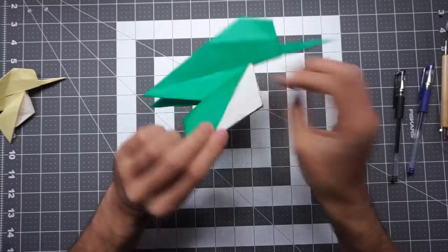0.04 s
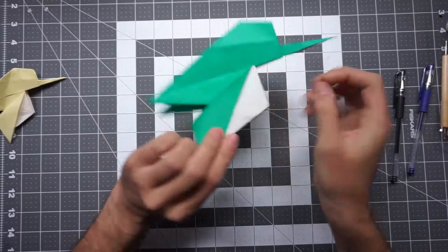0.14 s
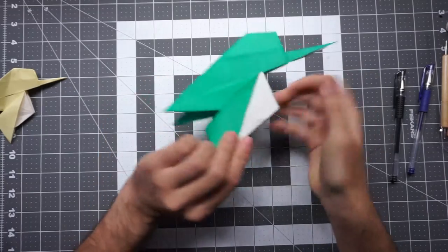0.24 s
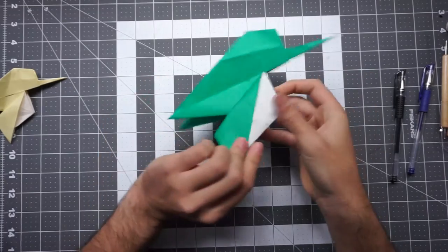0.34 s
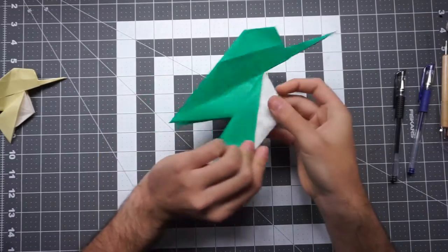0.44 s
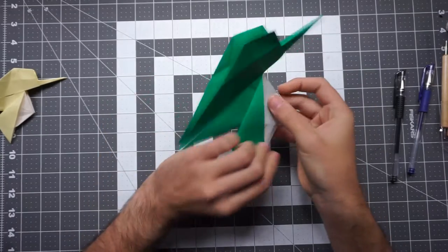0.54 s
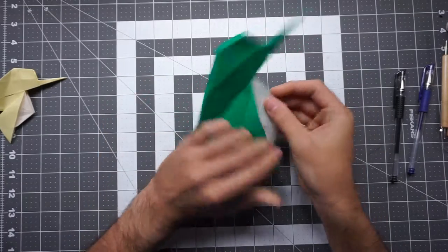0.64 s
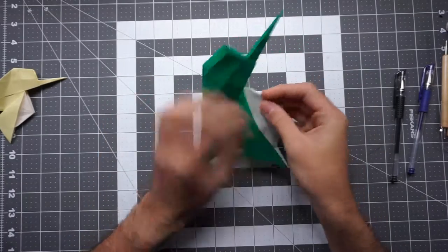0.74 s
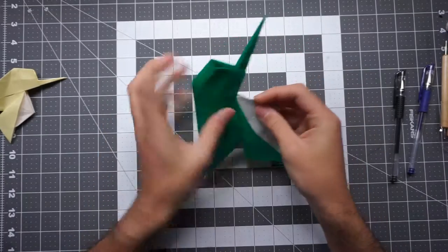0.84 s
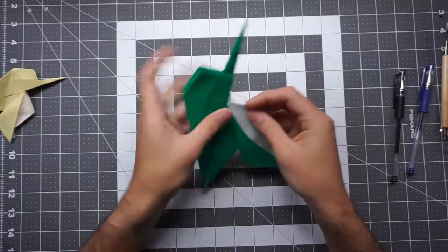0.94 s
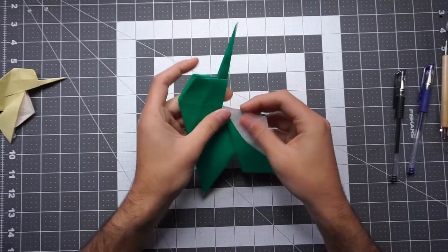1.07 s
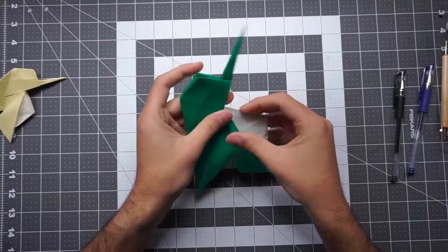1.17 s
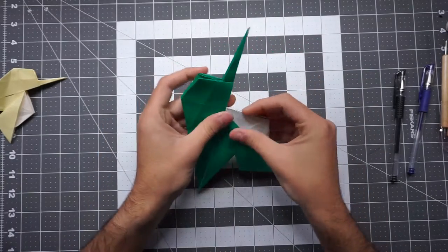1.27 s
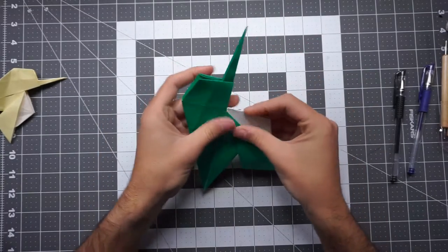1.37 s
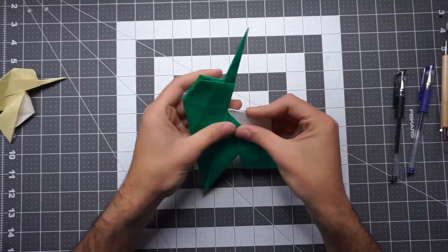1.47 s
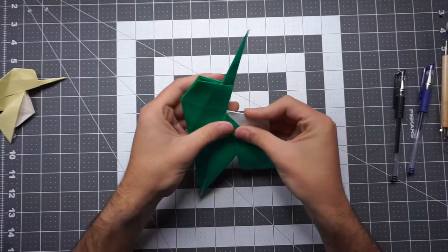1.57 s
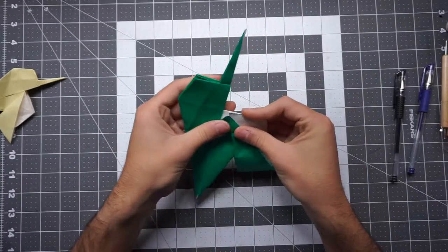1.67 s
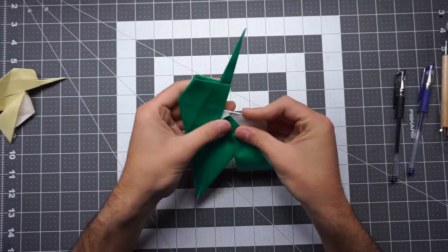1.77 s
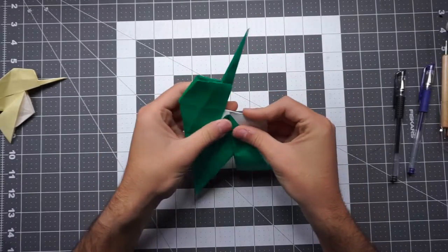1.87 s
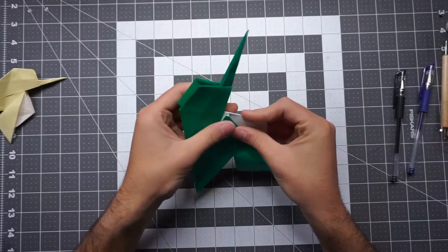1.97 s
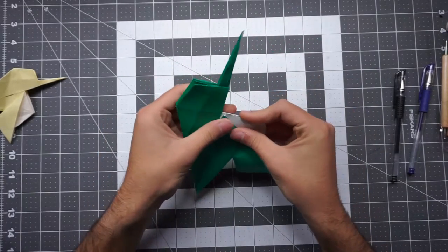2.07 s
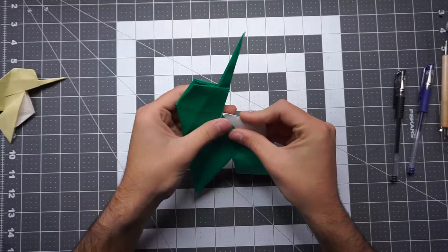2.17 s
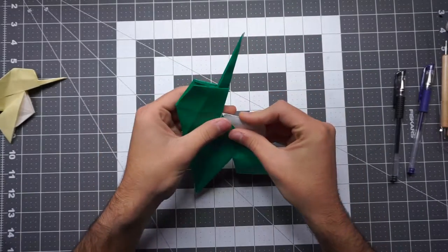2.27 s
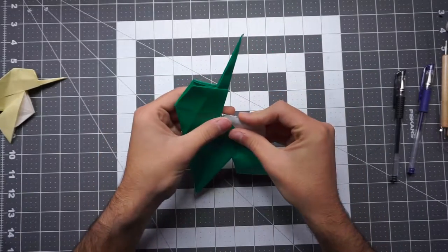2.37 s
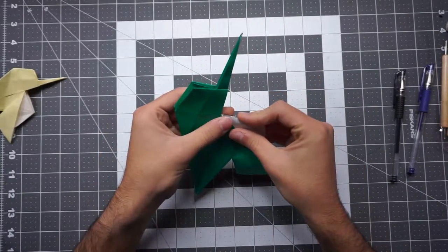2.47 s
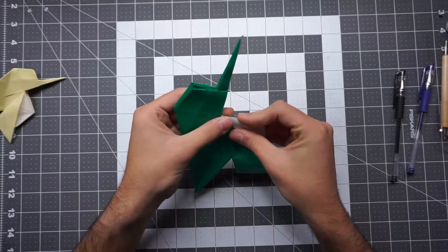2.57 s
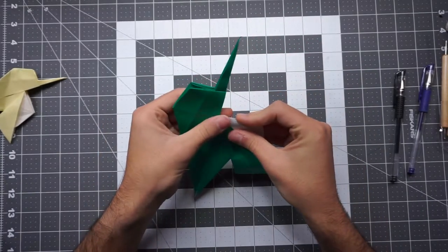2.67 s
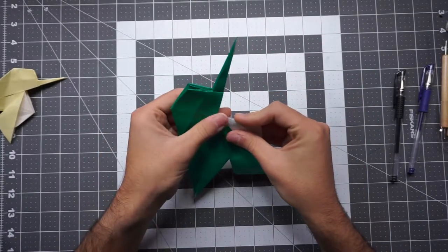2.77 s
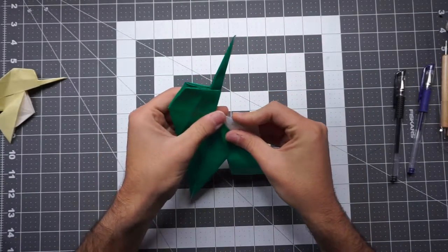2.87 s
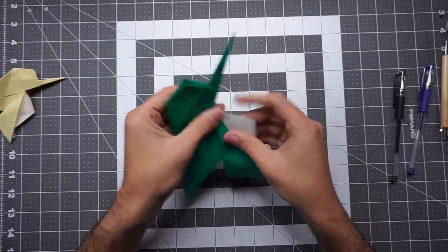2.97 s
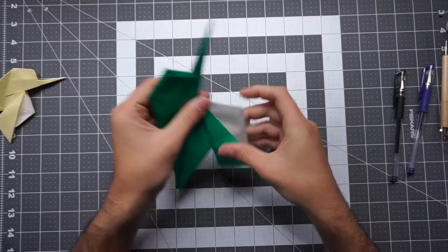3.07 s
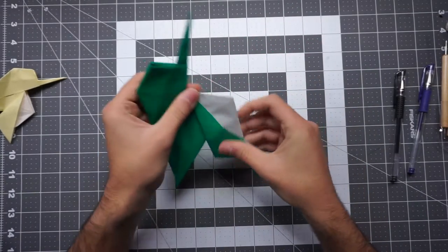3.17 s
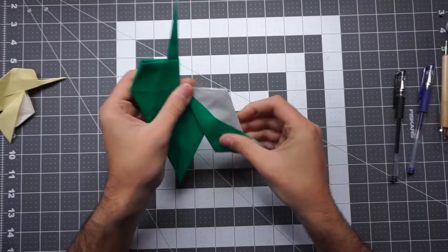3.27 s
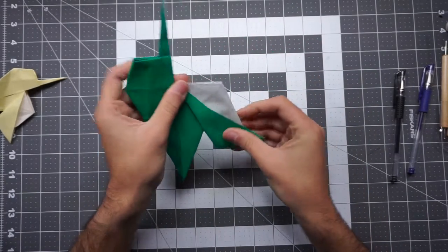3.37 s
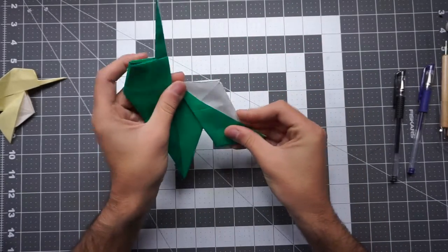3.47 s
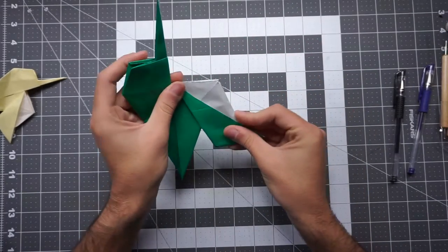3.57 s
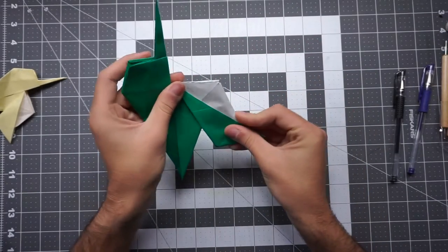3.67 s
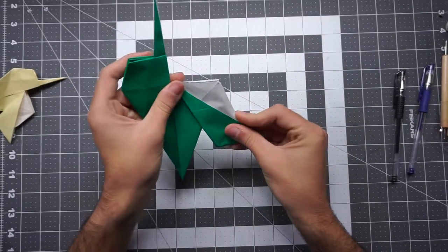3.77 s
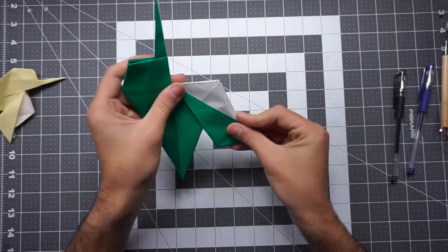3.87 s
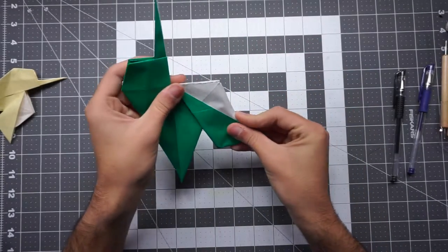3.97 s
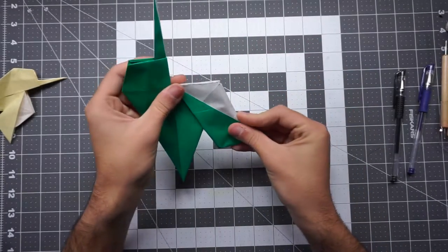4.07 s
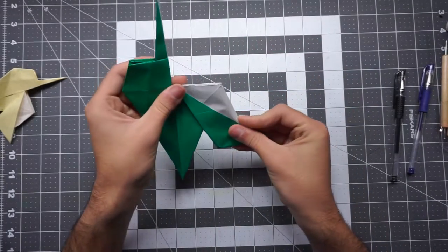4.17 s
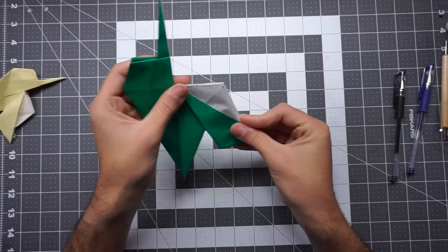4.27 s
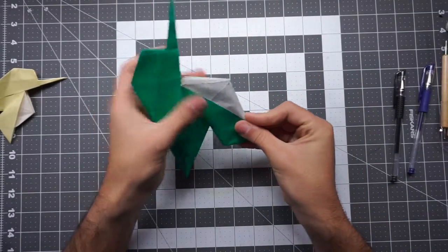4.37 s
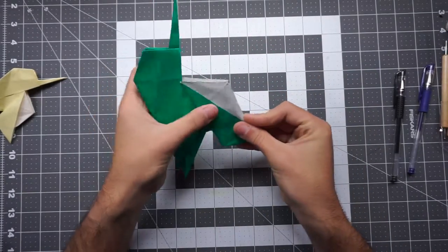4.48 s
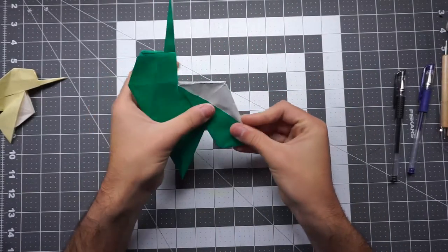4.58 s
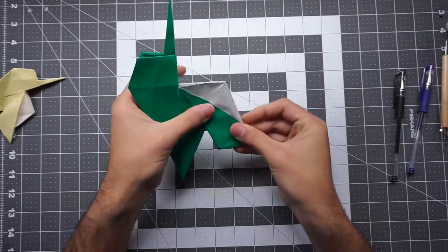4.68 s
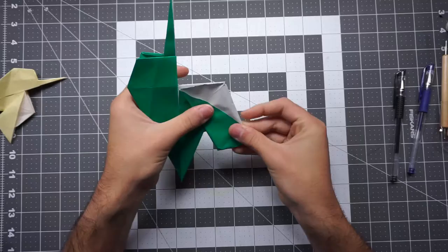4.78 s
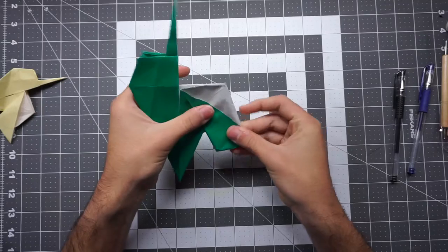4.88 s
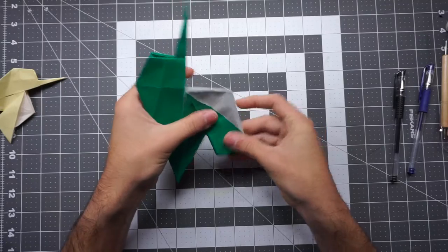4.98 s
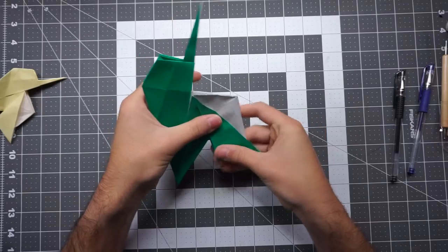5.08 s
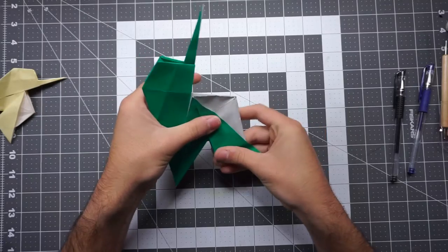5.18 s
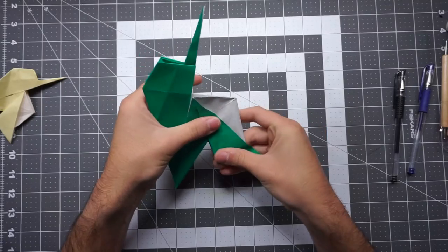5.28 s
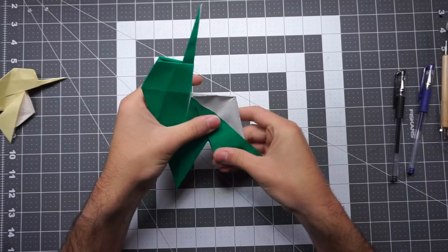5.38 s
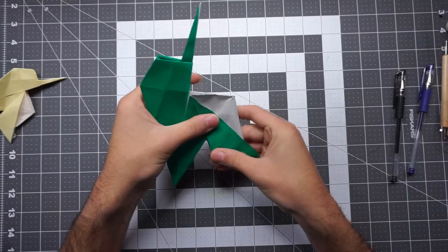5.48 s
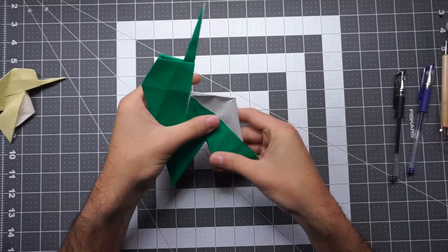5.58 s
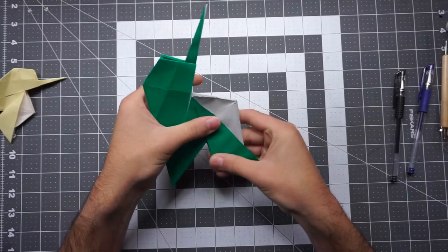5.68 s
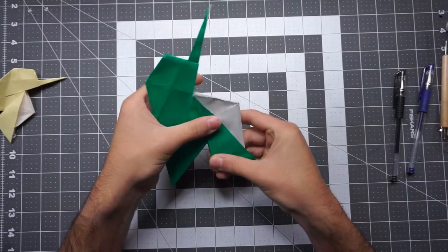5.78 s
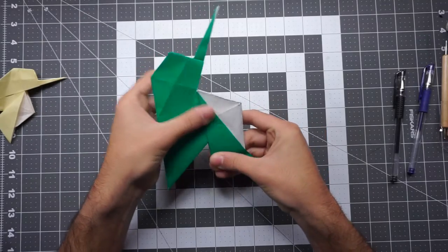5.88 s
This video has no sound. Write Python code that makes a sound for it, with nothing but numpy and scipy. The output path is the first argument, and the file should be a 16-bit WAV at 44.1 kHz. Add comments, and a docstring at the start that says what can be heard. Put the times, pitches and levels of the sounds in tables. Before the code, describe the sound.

Close stereo pickup of hands folding a paper figure above a mat in a small room. Dense crisp snaps and rustles come first, thinning after about two seconds to near quiet. Crackling returns around three seconds, with a tight cluster at four and a half and a last burst near the end. Faint room noise and a thin fluttering whir run throughout; a weak low hum joins late.

```python
"""Two hands fold a paper figure just above a cutting mat, close to a stereo microphone in a small room.
From the start: shaped room noise, a fluttering noise whir near 1 kHz and the rustle of grip and strokes (grains).
The sheet soon buckles in short snaps (crack, ring, flutter, mat echo), with crinkles at random and soft desk bumps.
From about 2.8 s a faint hum with a soft rumble emerges, slowly rising in pitch and varying in level."""
import sys
import numpy as np
from scipy import signal
from scipy.fft import rfft, irfft, next_fast_len
from scipy.io import wavfile
from scipy.ndimage import uniform_filter1d, map_coordinates

SR = 44100
rng = np.random.default_rng(int(sys.argv[2]) if len(sys.argv) > 2 else 0)


def master(y):
    """Save y as 16-bit WAV."""
    cut = np.clip(np.atleast_2d(y).T, -1, 1)
    pcm = np.round(cut * 32767)  # scale
    wavfile.write(sys.argv[1], SR, pcm.astype(np.int16))


N = 261513

# buckles of the sheet: t/s, level/dB before common gain, treble over bass/dB, facet ring f/Hz, flutter t60/s
SNAPS = [(0.0159, -33, 6, 5140, 0.0053), (0.0353, -31.5, 17, 3060, 0.043), (.1716, -39.5, -3, 3260, .016),
         (0.1967, -22, 16.5, 4530, 0.015), (.256, -44, -8, 1620, 0.019), (0.273, -28, 33, 5840, 0.008),
         (0.2763, -24, 11, 3500, 0.033), (0.3334, -35, 43, 10300, 0.0023), (.408, -31.5, -8.5, 1570, 0.023),
         (0.4298, -33, -12, 3300, .016), (0.4701, -26.5, 7, 4280, 0.049), (0.475, -27, 32, 9900, .016),
         (.493, -29.5, -9, 3200, 0.016), (.5367, -27.5, 18, 5530, 0.027), (0.5521, -30.5, 15, 4000, 0.0082),
         (.554, -22, 7, 5500, 0.023), (0.6558, -22.5, 12, 4440, 0.054), (0.7693, -33.5, 11, 2430, 0.029),
         (0.817, -27, 4, 4420, 0.039), (0.8982, -32.5, 44, 9850, 0.057), (1.1213, -32, 12.5, 8900, .027),
         (1.3255, -34.5, 1, 2550, 0.044), (1.4063, -41, 22, 2950, 0.012), (1.5075, -22.5, 14, 3850, 0.029),
         (1.5176, -24.5, 9, 2050, 0.009), (1.6519, -27.5, 6.5, 4070, 0.0095), (2.104, -42, 14, 5630, 0.096),
         (2.375, -38.5, -5, 2480, 0.058), (2.69, -46.5, 16, 8200, 0.047), (2.946, -41.5, 2.5, 1800, 0.05),
         (2.984, -41.5, -28, 3020, 0.022), (3.075, -36.5, 2, 1450, 0.043),
         (3.1565, -35.5, -10, 1660, 0.045), (3.2048, -20.5, 12.5, 5600, 0.022),
         (3.3671, -22, 30, 7040, 0.021), (3.3986, -39.5, 4, 3530, 0.017), (3.4674, -45.5, 30, 7900, 0.0063),
         (3.48, -40.5, 2, 3180, 0.018), (3.4914, -36, -2, 1580, 0.037), (3.5866, -37, 0.5, 4000, 0.02),
         (3.601, -43.5, -10, 1640, .016), (3.834, -41, -15, 2930, 0.018), (3.8433, -38.5, 23, 4550, 0.0089),
         (4.1585, -40, -7, 1900, 0.016), (4.1768, -28.5, 1, 1690, 0.019), (4.3258, -34.5, -1, 1890, 0.036),
         (4.3455, -30.5, 8, 10100, 0.019), (4.38, -27.5, 19, 4130, 0.0064), (4.3942, -35, -12, 4280, 0.022),
         (4.46, -28.5, 8.5, 2800, 0.037), (4.5038, -31, 3, 2370, 0.036), (4.51, -22.5, 15, 7480, 0.013),
         (4.5174, -24.5, 23, 4070, 0.0083), (4.5524, -23.5, 32, 10400, .016),
         (4.5748, -24, 23, 4050, 0.0095), (4.5816, -20.5, 30, 7500, 0.014), (4.672, -34, -6, 1830, 0.027),
         (4.7134, -36.5, 1.5, 800, 0.014), (4.7924, -40, -4.5, 1720, 0.019), (4.8094, -36, -21, 1470, .01),
         (4.8239, -29.5, -4, 2420, 0.023), (4.8485, -30.5, -20, 1110, .01),
         (4.893, -35.5, -13, 1800, 0.019), (4.9207, -42.5, -1, 1970, 0.019),
         (4.974, -36.5, 1.5, 9550, 0.023), (5.0939, -30.5, 3.5, 1900, 0.037), (5.1556, -43, 14, 2780, .012),
         (5.204, -41, -4, 3300, 0.0038), (5.2491, -39, 11, 10680, 0.027), (5.3583, -37, 25, 10500, 0.014),
         (5.4081, -30, 10.5, 6000, 0.0086), (5.515, -36, 13, 9000, 0.026), (5.5282, -35.5, -6, 1830, 0.016),
         (5.638, -42, 28, 10760, .012), (5.7325, -44.5, 18, 6400, 0.032), (5.8015, -34.5, -8, 1110, 0.024),
         (5.813, -21, 30, 6200, 0.0024), (5.8212, -29, 6, 10700, 0.021), (5.8375, -31, 3, 3260, 0.04)]
# pushes of paper over paper: start t/s, length/s, sliding level/dB, flexing level/dB (both before
# layer gain), rubbed flap f/Hz
STROKES = [(0, .18, -44, -46.5, 4800), (0.267, 0.028, -34, -41, 3750), (0.354, 0.025, -38.5, -43.5, 10000),
           (0.419, 0.12, -39.5, -43.5, 3330), (0.454, 0.038, -26, -52, 9600),
           (0.544, 0.039, -31.5, -62, 10400), (0.608, 0.049, -36.5, -46, 8500),
           (0.765, 0.01, -38, -44, 2330), (0.881, 0.091, -33.5, -48, 9300),
           (0.994, .14, -41.5, -47.5, 8500), (1.18, 0.13, -49.5, -64, 9000), (1.328, 0.028, -37, -43, 8450),
           (1.369, 0.031, -56, -52, 9200), (1.504, 0.024, -34, -44, 1500), (1.619, .045, -51, -52, 3900),
           (1.876, 0.077, -55, -55.5, 3650), (1.933, 0.032, -35.5, -56, 9250),
           (2.387, 0.087, -63, -59, 2090), (2.571, 0.035, -53.5, -60, 9300),
           (2.828, 0.019, -45.5, -55, 1800), (2.974, 0.14, -39.5, -46.5, 8300),
           (3.133, 0.12, -43, -47, 9000), (3.199, 0.0076, -30, -36, 1810), (3.321, .1, -47, -52.5, 5630),
           (4.117, 0.059, -64, -74, 1725), (4.318, 0.037, -44, -41, 7950), (4.368, 0.028, -34, -40.5, 4000),
           (4.42, 0.037, -36.5, -42, 4040), (4.533, 0.074, -40, -65, 3780),
           (4.964, 0.097, -43.5, -74, 5560), (5.081, 0.015, -46, -41.5, 1660),
           (5.354, .06, -49.5, -52, 3400), (5.632, 0.046, -46, -77, 3770), (5.83, 0.12, -38.5, -46.5, 5600)]
# left-right likeness of the room sounds: f/Hz, coherence/1
ROOM_ALIKE = [(40, 0.93), (130, 0.87), (260, 0.043), (1000, 0.077), (3000, 0.043), (10000, 0.048)]

STROKE_ATTACK_S, STROKE_SAG_DB_PER_S, STROKE_T60_S = 0.0045, 25, 0.11


def amp(db):
    """Decibels to gain."""
    return 10 ** (np.asarray(db) / 20)


def unit(x):
    """Scale to rms 1."""
    return x / np.sqrt(np.mean(x ** 2) + 1e-20)


def fade(t, t60):
    """Exponential decay by 60 dB in t60, at least 1 ms."""
    return np.exp(-np.log(1000) * t / np.maximum(t60, 1e-3))


def along(points, hz):
    """Read (f/Hz, value) points on a log axis."""
    f, v = np.transpose(points)
    return np.interp(np.log(hz + 1), np.log(f + 1), v)


def curves(rows):
    """One value per sample for each column after the time."""
    s, *cols = np.transpose(rows)
    return [np.interp(np.arange(N) / SR, s, c) for c in cols]


def wobble(rate_hz):
    """A smooth random curve with rate_hz knots a second."""
    knots = rng.standard_normal(int(N * rate_hz / SR) + 4)
    return map_coordinates(knots, [np.arange(N) * rate_hz / SR])


def filtered(x, response):
    """x times a response of frequency."""
    m = next_fast_len(N + SR // 4)
    return irfft(rfft(x, m) * response(np.fft.rfftfreq(m, 1 / SR)), m)[..., :N]


def stereo(pair, spectrum, alike):
    """Two unrelated signals become a coloured, partly alike left and right of rms 1."""
    def response(hz):
        turn = np.arccos(np.clip(along(alike, hz), -1, 1)) / 2
        return amp(along(spectrum, hz)) * [np.cos(turn), np.sin(turn)]

    mid, side = filtered(pair, response)
    return unit(np.array([mid + side, mid - side]))


def reshaped(pair, depth_db):
    """Patches of colour come and go, as when resonances shift in a bending sheet."""
    z = signal.stft(pair, nperseg=512)[2]
    field = uniform_filter1d(rng.standard_normal(z.shape[1:]), size=6, axis=0)  # over frequency
    field = uniform_filter1d(field, size=9, axis=1)  # over time
    return signal.istft(z * amp(depth_db * unit(field)), nperseg=512)[1][:, :N]


def air(level_db=-59):
    """Steady room noise: shaped Gaussian noise."""
    # room noise spectrum: f/Hz, relative density/dB
    noise_spectrum = [(15, -40), (30, -3), (60, -3), (130, -1), (250, -6.5), (480, -10), (800, -11.5),
                      (1060, -5), (1330, -14.5), (2400, -17.5), (5000, -23), (11000, -33.5)]
    return amp(level_db) * stereo(rng.standard_normal((2, N)), noise_spectrum, ROOM_ALIKE)


def whir(level_db=-65, flutter_db=3.8):
    """A narrow noise band near 1 kHz flutters in level and colour."""
    # whir spectrum: f/Hz, relative density/dB
    whir_spectrum = [(750, -58), (890, -21), (940, -3), (1010, -12), (1070, 1), (1125, -16), (1195, -29),
                     (1250, -36), (1400, -68)]
    noise = reshaped(rng.standard_normal((2, N)), depth_db=4.5)
    return amp(level_db) * stereo(amp(flutter_db * wobble(22)) * noise, whir_spectrum, [(1000, 0.9)])


def stroke(start_s, length_s):
    """A push takes hold quickly, eases off as it goes and dies away when the finger stops."""
    t = np.maximum(np.arange(N) / SR - start_s, 0)
    push = np.minimum(t / STROKE_ATTACK_S, 1) * amp(-STROKE_SAG_DB_PER_S * t)
    return push * fade(np.clip(t - length_s, 0, 1), STROKE_T60_S)


def handling(grip_slide_db=0.5, settle_db=-14.5, settle_t60_s=0.12):
    """How strongly the paper flexes and slides: grip, strokes and settling after snaps add in power."""
    # restless grip, following the effort of the hands: t/s, flexing level/dB before layer gain
    grip = [(0, -52), (.55, -53), (.73, -50), (1.15, -52.5), (1.55, -53), (1.78, -58), (2.15, -59.5),
            (2.3, -66.5), (2.85, -60), (3.2, -55), (3.55, -61), (3.75, -64.5), (4.25, -61), (4.5, -47.5),
            (4.75, -60.5), (4.93, -57), (5.3, -60.5), (5.93, -55)]
    grip_db, = curves(grip)
    flexing, sliding = amp(grip_db) ** 2, amp(grip_db + grip_slide_db) ** 2
    for start_s, length_s, slide_db, flex_db, _ in STROKES:
        push = stroke(start_s, length_s) ** 2
        flexing += amp(flex_db) ** 2 * push
        sliding += amp(slide_db) ** 2 * push
    settling = fade(np.arange(SR // 3) / SR, settle_t60_s)
    for s, db, *_ in SNAPS:
        after = flexing[round(s * SR):][:len(settling)]  # a view: adds in place
        after += (amp(db + settle_db) * settling[:len(after)]) ** 2
    return np.sqrt(flexing), np.sqrt(sliding)


def grains(rate_hz, spread_db, t60_s, smooth_share, flutter_db):
    """Tiny slips of random size, each a short puff of noise, over friction that catches and lets go."""
    sizes = amp(spread_db * np.clip(rng.standard_normal(N), -2, 2)) * (rng.random(N) < rate_hz / SR)
    puff = fade(np.arange(SR // 50) / SR, t60_s) ** 2
    power = np.abs(signal.fftconvolve(sizes ** 2, puff)[:N])
    envelope = np.sqrt(smooth_share + (1 - smooth_share) * power / power.mean())
    return amp(flutter_db * wobble(70)) * envelope * rng.standard_normal((2, N))


def rustle(flex_db=0.0, slide_db=2.5):
    """Bending paper crackles sparsely in the middle range; sliding paper hisses with dense fine slips."""
    # spectra of bending and sliding paper: f/Hz, relative density/dB
    flex_spectrum = [(60, -11), (200, -14.5), (330, -7), (550, -9.5), (900, 0), (1300, -1), (2000, -2.5),
                     (3200, -4.5), (4500, -4.5), (7000, -12.5), (12000, -10)]
    slide_spectrum = [(800, -7), (2200, -16), (3800, 3), (5000, -3.5), (6500, 3.5), (8500, 6.5), (10500, 7),
                      (12000, 9)]
    # left-right likeness of the paper: f/Hz, coherence/1
    paper_alike = [(200, 0.8), (1000, 0.85), (4000, 0.31), (10000, 0.58)]
    flexing, sliding = handling()
    creaks = grains(rate_hz=330, spread_db=4, t60_s=.006, smooth_share=.35, flutter_db=1)
    slips = grains(rate_hz=1000, spread_db=3, t60_s=.004, smooth_share=.5, flutter_db=1.1)
    crackle = stereo(reshaped(creaks, depth_db=3.0), flex_spectrum, paper_alike)
    hiss = stereo(reshaped(slips, depth_db=2.0), slide_spectrum, paper_alike)
    hiss_lean = amp([[.5], [-.5]])  # slightly left
    return amp(flex_db) * flexing * crackle + amp(slide_db) * sliding * hiss * hiss_lean


def flaps(level_db=-6.5, q=3.2):
    """Each stroke also sets the rubbed flap ringing in tiny slips, which tints the hiss."""
    out = np.zeros((2, N))
    slips = grains(rate_hz=600, spread_db=4, t60_s=.005, smooth_share=.3, flutter_db=1)
    for start_s, length_s, slide_db, flex_db, hz in STROKES:
        span = slice(round(start_s * SR), round((start_s + length_s + STROKE_T60_S) * SR))
        push = stroke(start_s, length_s)[span] * np.hypot(amp(slide_db), amp(flex_db))
        mid, side = signal.lfilter(*signal.iirpeak(hz, q, fs=SR), slips[:, span])
        out[:, span] += push * unit(mid + np.outer([.5, -.5], side))
    return amp(level_db) * out


def room(x, early_db=-14, early_t60_s=0.058, late_db=-13):
    """Things on the desk scatter the sound almost at once; the walls answer with a short tail."""
    # wall decay: f/Hz, t60/s
    walls = [(200, 0.98), (1500, 0.35), (5000, 0.37), (11000, 0.087)]
    hz, t, z = signal.stft(rng.standard_normal((2, SR // 3)), SR, nperseg=256)
    late = signal.istft(z * fade(t, along(walls, hz)[:, None]), SR, nperseg=256)[1]
    early = rng.standard_normal(late.shape) * fade(np.arange(late.shape[1]) / SR, early_t60_s)
    tail = amp(early_db) * early / np.linalg.norm(early[0]) + amp(late_db) * late / np.linalg.norm(late[0])
    delayed = np.pad(tail, ((0, 0), (SR // 400, 0)))  # 2.5 ms
    return signal.fftconvolve(x, delayed, axes=1)[:, :N]


def facet_levels(level_db, bright_db, ring_hz, body_hz=3560, body_octaves=0.73, body_db=9.5):
    """Share a level among bass, middle and treble; facets ringing near body_hz radiate best in the middle."""
    middle_db = body_db * np.exp(-(np.log2(ring_hz / body_hz) / body_octaves) ** 2)
    shape_db = np.array([-bright_db / 2, middle_db, bright_db / 2])
    return level_db + shape_db - 20 * np.log10(np.linalg.norm(amp(shape_db)))


def snap(levels_db, ring_hz, t60_s, ring=1.6, ring_cycles=12, ring_t60_s=0.036,
         crack=1.73, crack_t60_s=0.0012, bounce=0.53, width=0.36):
    """A facet flips: a sharp crack, a few cycles of its ring and a dying flutter, echoed by the mat."""
    # edges of the bass, middle and treble bands: f/Hz
    band_edges_hz = [430, 1800, 5000, 11300]
    t = np.arange(SR // 30) / SR
    flutter, spread, edge = rng.standard_normal((3, len(t)))
    # fingers damp the ring, so even low ones are short
    tone = np.sin(2 * np.pi * ring_hz * t) * fade(t, min(ring_cycles / ring_hz, ring_t60_s))
    direct = flutter * fade(t, t60_s) + ring * tone + crack * edge * fade(t, crack_t60_s)
    # the mat lies a hand's breadth below, so its echo follows about a millisecond later
    lag = round(SR * rng.uniform(.0009, .0015))
    mid = direct + bounce * np.pad(direct, (lag, 0))[:len(t)]
    side = spread * fade(t, t60_s)
    out = np.zeros((2, len(t)))
    for db, low_hz, high_hz in zip(levels_db, band_edges_hz, band_edges_hz[1:]):
        band = signal.butter(3, (low_hz, high_hz), "band", fs=SR, output="sos")
        m, s = signal.sosfilt(band, [mid, side])
        s = s - m * (s @ m) / (m @ m)  # width without a pull to either side
        out += amp(db) * (unit(m) + width * np.outer([1, -1], unit(s)))
    return out


def snaps(level_db=-9):
    """Every buckle of the sheet, each a little to one side."""
    out = np.zeros((2, N + SR))
    for s, db, bright_db, ring_hz, t60_s in SNAPS:
        lean = amp(np.array([[1], [-1]]) * rng.normal(0.11, 0.33))  # dB per side
        one = snap(facet_levels(db, bright_db, ring_hz), ring_hz, t60_s) * lean
        out[:, round(s * SR):][:, :one.shape[1]] += one
    return amp(level_db) * out[:, :N]


def crinkles(level_db=-9, count=110, size_db=-10, spread_db=3, bright_db=14,
             typical_hz=3350, spread_octaves=0.57, t60_s=0.025):
    """Tiny facets flip at random among the snaps, as strongly as the sheet is being flexed."""
    flexing, _ = handling()
    out = np.zeros((2, N + SR))
    starts = rng.integers(0, N, count)
    scatter = np.clip(rng.standard_normal((count, 2)), -2, 2)
    for i, (size, pitch) in zip(starts, scatter):
        ring_hz = typical_hz * 2 ** (spread_octaves * pitch)
        levels_db = facet_levels(size_db + spread_db * size, bright_db, ring_hz)
        one = flexing[i] * snap(levels_db, ring_hz, t60_s)
        out[:, i:][:, :one.shape[1]] += one
    return amp(level_db) * out[:, :N]


def bumps(width=0.24, rise_s=0.00097):
    """A hand meets the desk: a soft blow of noise that dies away around one low tone."""
    # soft blows on the desk: t/s, level/dB before decay, desk tone f/Hz, t60/s
    blows = [(0.111, -52.5, 114, 0.32), (0.82, -53, 320, 0.57), (0.819, -61, 148, 0.2),
             (3.206, -47.5, 300, 0.14), (4.13, -56, 36, .7)]
    out, t = np.zeros(2 * N), np.arange(N) / SR
    for s, db, tone_hz, t60_s in blows:
        body = unit(filtered(rng.standard_normal(N),
                             lambda hz: 1 / (1 + ((hz / tone_hz - 1) / width) ** 2) ** 2))
        out[round(s * SR):][:N] += amp(db) * body * fade(t, t60_s) * (1 - np.exp(-t / rise_s))
    return out[:N]


def hum(rumble_db=-8):
    """A distant sine, slowly rising and slightly unsteady in pitch, carries a soft noise rumble."""
    # distant hum: t/s, pitch f/Hz, level/dB
    hum_course = [(2.55, 121, -77), (2.8, 123.5, -60.5), (3.2, 123.5, -58), (4.15, 127.8, -53),
                  (4.55, 130.3, -69.5), (4.9, 133.5, -63.5), (5.3, 135, -55), (5.55, 138.3, -63.5),
                  (5.93, 140, -61.5)]
    pitch_hz, level_db = curves(hum_course)
    phase = 2 * np.pi * np.cumsum(pitch_hz + 0.57 * wobble(8)) / SR
    tone = np.sqrt(2) * np.sin(phase)  # rms 1
    rumble_spectrum = [(20, -14), (90, -3), (170, -4), (300, -14), (700, -61)]  # f/Hz, density/dB
    rumble = stereo(rng.standard_normal((2, N)), rumble_spectrum, ROOM_ALIKE)
    return amp(level_db) * (tone + amp(rumble_db) * rumble)


def scene():
    """The paper and the hands, their room and the background."""
    near = rustle() + flaps() + snaps() + crinkles() + bumps()
    return air() + whir() + near + room(near) + hum()


def record(dry, top_hz=11060):
    """The recorder cuts off the top of the treble steeply."""
    return filtered(dry, lambda hz: 1 / np.sqrt(1 + (hz / top_hz) ** 400))


dry = scene()
out = record(dry)
master(out)
```